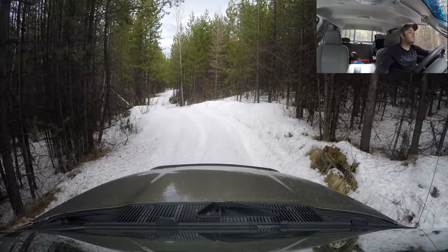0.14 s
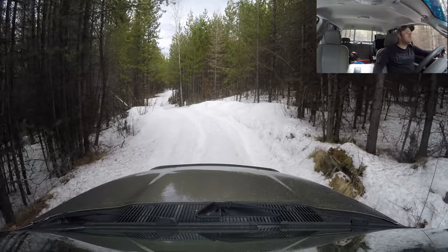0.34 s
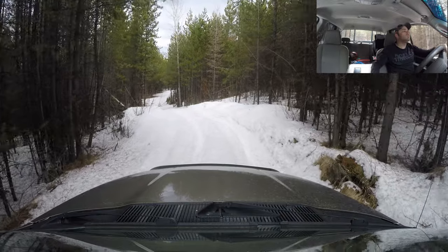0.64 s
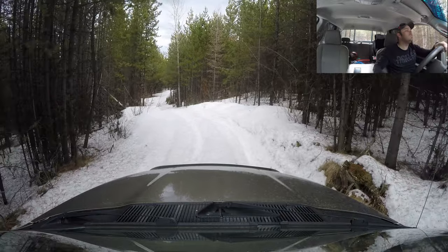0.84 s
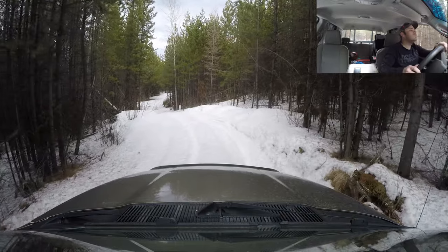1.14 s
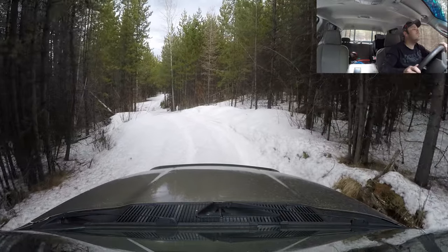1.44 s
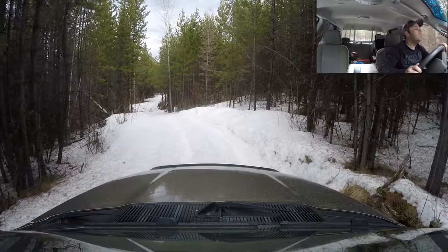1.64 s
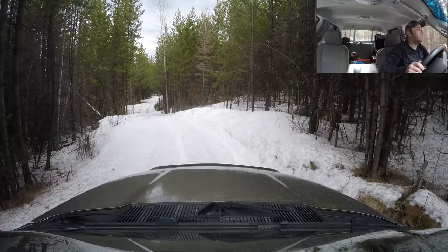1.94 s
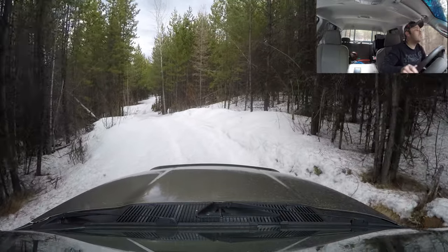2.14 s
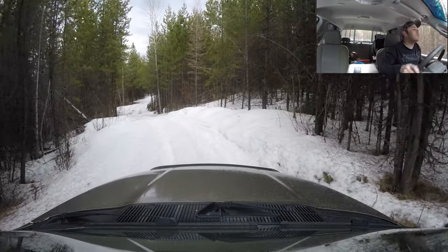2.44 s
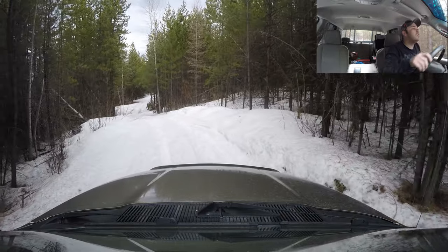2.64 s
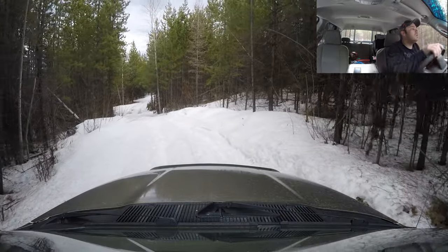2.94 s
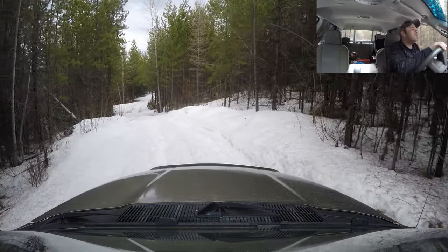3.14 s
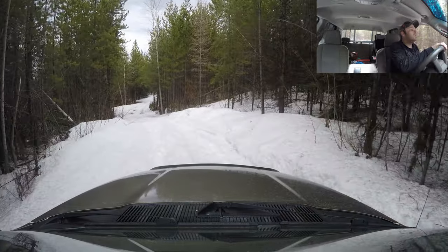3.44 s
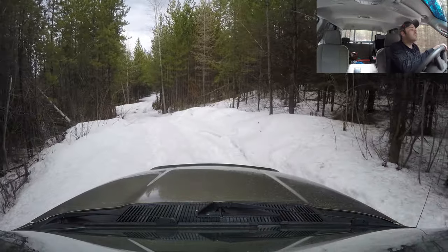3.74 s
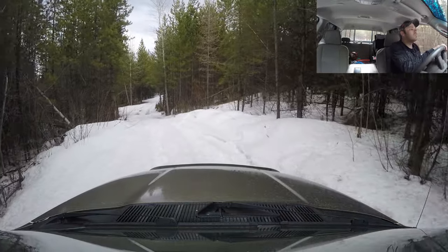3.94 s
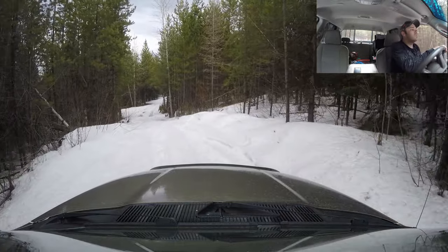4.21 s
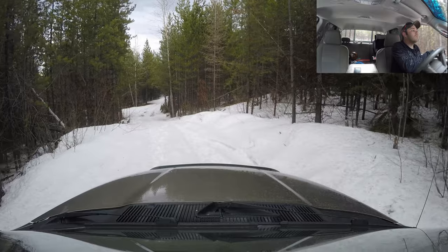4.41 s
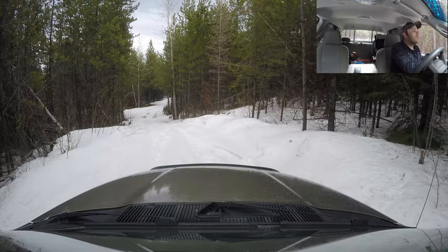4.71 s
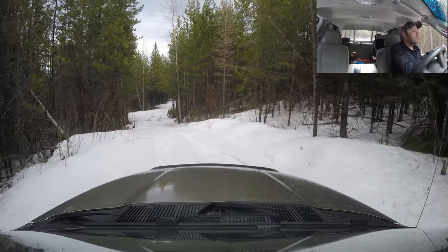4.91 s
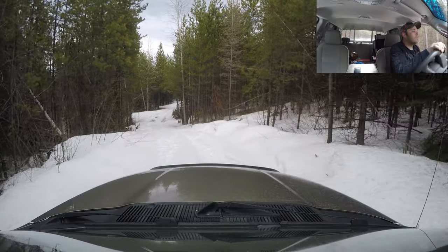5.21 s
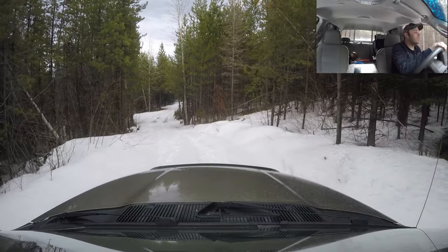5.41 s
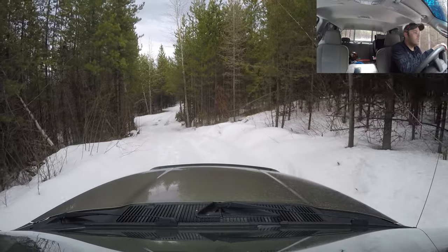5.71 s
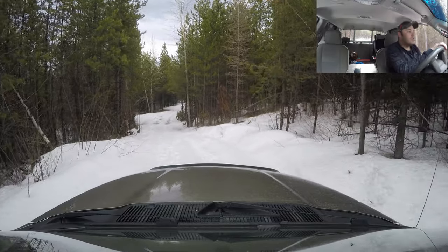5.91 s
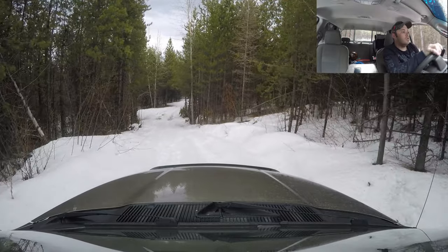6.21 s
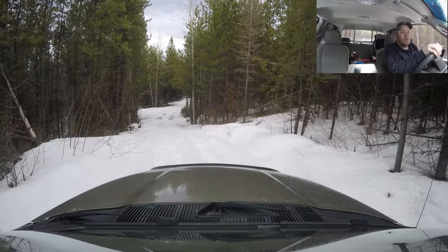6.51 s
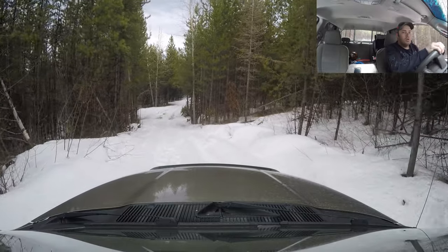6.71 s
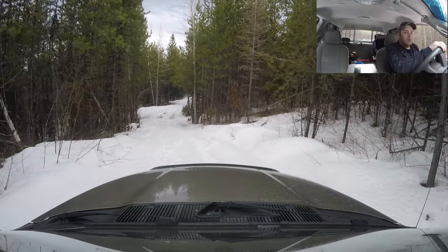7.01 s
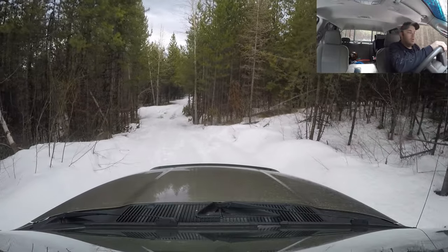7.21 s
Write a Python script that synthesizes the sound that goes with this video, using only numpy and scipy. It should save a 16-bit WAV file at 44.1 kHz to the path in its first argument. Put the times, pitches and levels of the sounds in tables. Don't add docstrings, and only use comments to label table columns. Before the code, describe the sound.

The sound opens abruptly inside a truck cab, with a large engine droning low and slowly sinking in pitch under load. Very deep, irregular heaves and booms from ruts dominate, over muffled tyre roar and soft snow hiss. At 0.3 and 0.65 seconds loose trim knocks, with a short creak, then a dull thud at 0.85 and a door panel buzzing. Around 2.1 to 2.5 a faint crust crunch comes with light ticks and one duller tap. From 3 to 4.8 it rolls steadily, the driveshaft humming slightly higher. Near 5.1 come ticks, a tiny seat squeak and wetter hiss, then soft thuds at 5.35 and 5.7. More knocks and thuds follow between 6.3 and 6.7. An axle hum swells around 6.3 and again near 7.1, engine lugging until the abrupt end at about 7.4.

```python
import sys
import numpy as np
from scipy import signal
from scipy.fft import rfft, irfft
from scipy.io import wavfile
from scipy.ndimage import uniform_filter1d

SR = 44100
rng = np.random.default_rng(int(sys.argv[2]) if len(sys.argv) > 2 else 0)


def voltage_ratio(level):
    return 10 ** (np.asarray(level, float) / 20)


def bounce(signal):
    frames = np.transpose(np.atleast_2d(signal))
    limited = np.clip(frames, -1, 1)
    pcm = np.round(limited * 32767).astype(np.int16)
    wavfile.write(sys.argv[1], SR, pcm)


N = 324576


def evened(x):
    return x / np.sqrt(np.mean(x ** 2) + 1e-20)


def at_samples(s, values):
    return np.interp(np.arange(N) / SR, s, values)


def curves(rows):
    s, *columns = np.transpose(rows)
    return [at_samples(s, c) for c in columns]


def swells(rows, rest_db):
    t = np.arange(0, N / SR + .01, .002)
    rows = np.array(rows)
    half_lengths = (t - rows[:, :1]) / rows[:, 2:3]
    shape_db = rows[:, 1:2] - 14.5 * half_lengths ** 2
    power = voltage_ratio(2 * np.maximum(shape_db, -150))
    db = 10 * np.log10(power.sum(axis=0) + voltage_ratio(2 * rest_db))
    held = uniform_filter1d(rows[shape_db.argmax(axis=0), -1], size=15)
    return [at_samples(t, c) for c in (db, held)]


def spectrum_db(points, hz):
    f, db = np.transpose(points)
    return np.interp(np.log(hz + 1), np.log(f + 1), db)


def coloured(x, db):
    return evened(irfft(rfft(x) * voltage_ratio(db), N))


def near(hz, mode_hz, width_hz):
    return -10 * np.log10(1 + (2 * (hz - mode_hz) / width_hz) ** 2)


def drift(width_hz):
    r = np.exp(-np.pi * width_hz / SR)
    z = rng.standard_normal(N) + 1j * rng.standard_normal(N)
    for _ in range(2):
        z = signal.lfilter([1 - r], [1, -r], z)
    return z / np.sqrt(np.mean(abs(z) ** 2))


def tone(hz, db, rough, width_hz):
    rough = np.clip(rough, 0, 1)
    turn = np.exp(2j * np.pi * (np.cumsum(hz, axis=-1) / SR + rng.random()))
    wobble = np.sqrt(1 - rough) + np.sqrt(rough) * drift(width_hz)
    return np.sqrt(2) * voltage_ratio(db) * (turn * wobble).real


def ring(x, hz, width_hz):
    b, a = signal.iirpeak(min(hz, 15000), max(hz / width_hz, .6) / 0.77, SR)
    return signal.lfilter(b, a, signal.lfilter(b, a, x))


def add(mix, s, sound):
    part = mix[round(s * SR):][:len(sound)]
    part += sound[:len(part)]


# time in seconds, roar in dB.
ROLL = [(0, -44), (.8, -43.5), (1.1, -45.5), (1.9, -47), (2.74, -46.5), (3.27, -45.5), (4.09, -47),
        (4.42, -46), (4.82, -47), (5.19, -48.5), (5.4, -47.5), (6.23, -48.5), (7.36, -49)]
ROLL_MID_DB = -45
# frequency in Hz, level in dB per Hz.
ROAR_SPECTRUM = [(26, -26), (45, -7.5), (64, -9.5), (86, -16.5), (119, -15.5), (173, -12), (242, -19),
                 (317, -28), (366, -25), (472, -31.5), (553, -29), (701, -36), (784, -34.5), (933, -43),
                 (2000, -58.5), (2600, -87.5), (4400, -120)]
HISS_SPECTRUM = [(530, -15), (900, -1.5), (1040, -4), (1120, -8.5), (1690, -9), (1840, -9.5), (2540, -13.5),
                 (11100, -31), (14400, -39), (15500, -51.5)]
CRUNCH_SPECTRUM = [(1500, -12), (4000, 0), (7000, -5), (11000, -7), (15600, -8)]
# frequency in Hz, width in Hz, lift in dB.
CAB_MODES = [(168, 11, 3), (286.4, 29, 4.5), (503, 47, 0.5), (563, 120, -0.5), (752, 28, 1.5),
             (1079, 96, 3), (1300, 87, 4), (1462, 53, 2.5), (700, 72, -3), (2500, 430, 3.5),
             (4500, 1100, 2)]
# middle in seconds, level in dB, half length in seconds.
SLUSH = [
    (.55, -4, 0.45),
    (1.9, -1.5, 0.38),
    (2.74, -4, 0.5),
    (4.42, -9, 0.16),
    (5.19, 0, 0.39),
    (6.6, -0.5, 0.47),
]
# middle in seconds, level in dB, half length in seconds.
CRUST = [
    (2.12, -58.5, 0.14),
    (2.26, -63.5, 0.16),
    (2.39, -61, 0.072),
    (5.15, -73, 0.2),
    (6.13, -67.5, 0.24),
]


def rolling():
    roar_db, = curves(ROLL)
    crust_db, _ = swells(CRUST, rest_db=-70.5)
    slush_db, _ = swells(SLUSH, rest_db=2.0)
    hiss_db = -53.5 + 0.66 * (roar_db - ROLL_MID_DB) + slush_db
    hz = np.fft.rfftfreq(N, 1 / SR)
    modes_db = sum(db / (1 + (2 * (hz - f) / width_hz) ** 2) for f, width_hz, db in CAB_MODES)

    roar = coloured(rng.standard_normal(N), spectrum_db(ROAR_SPECTRUM, hz) + modes_db)
    flicker = voltage_ratio(.9 * drift(90).real)
    hiss = coloured(rng.standard_normal(N) * flicker, spectrum_db(HISS_SPECTRUM, hz) + modes_db)

    breaks = rng.random(N) < 2500 / SR
    grains = voltage_ratio(3.0 * np.minimum(rng.exponential(1, N), 4)) * breaks
    puffs = signal.lfilter([1], [1, -np.exp(-1 / 30)], grains) * rng.standard_normal(N)
    crunch = coloured(puffs, spectrum_db(CRUNCH_SPECTRUM, hz))
    return roar * voltage_ratio(roar_db + 16.5) + hiss * voltage_ratio(hiss_db) + crunch * voltage_ratio(crust_db)


# frequency in Hz, width in Hz, level in dB.
GLASS = [(525, 18, -55), (571, 16, -54), (770, 20, -57), (860, 12, -64), (1040, 16, -65)]
# middle in seconds, level in dB, half length in seconds.
BRACKET = [
    (1.95, -62, .25),
    (3.5, -65, .3),
    (4.3, -66, .3),
    (6.12, -65, .2),
    (6.9, -66, .12),
]


def glass_and_bracket():
    roar_db, = curves(ROLL)
    still = np.ones(N)
    out = tone(1420 * still, swells(BRACKET, rest_db=-73)[0], rough=0.98, width_hz=11)
    for hz, width_hz, db in GLASS:
        out += tone(hz * still, db + roar_db - ROLL_MID_DB, rough=0.96, width_hz=width_hz)
    return out


# start in seconds, peak in dB, ring in Hz, width in Hz.
TICKS = [(0.049, -46, 2280, 1200), (0.58, -54, 9700, 5000), (0.99, -46, 3000, 1215),
         (1.893, -49, 7005, 3990), (1.982, -48, 4000, 3990), (2.117, -55, 7740, 1498),
         (2.22, -52, 6400, 2010), (2.376, -49, 7000, 9000), (2.414, -47, 3800, 2500),
         (2.457, -39, 624, 398), (2.552, -43, 4130, 2200), (2.574, -47, 4500, 3000),
         (2.892, -52, 7420, 9010), (3.81, -46, 1302, 300), (4.02, -57, 11600, 4000),
         (4.42, -51, 6030, 2005), (4.457, -49, 5503, 1210), (5.11, -46, 5030, 2500),
         (5.109, -43, 2280, 1508), (5.141, -50, 6013, 7000), (5.18, -49.5, 4500, 4000),
         (5.18, -47, 2053, 500), (5.277, -47, 2500, 700), (5.283, -54, 3130, 1200),
         (5.665, -48, 2770, 1500), (5.942, -54, 5400, 1497), (6.09, -44, 5340, 1000), (6.1, -52, 5200, 700),
         (6.128, -50, 4200, 900), (6.129, -45, 2330, 901), (6.155, -51, 5110, 1500),
         (6.346, -46, 2406, 1200), (6.359, -44, 2870, 1300), (6.589, -42.5, 5490, 5000),
         (6.596, -42.5, 3850, 2500), (6.628, -55, 4010, 1198), (7.357, -47, 6070, 2500),
         (.699, -52, 6000, 900), (1.523, -56, 6000, 4000), (1.61, -51, 4000, 3000),
         (1.942, -56.5, 8000, 2500), (6.068, -55, 4500, 900), (6.311, -53, 4500, 900),
         (7.251, -53, 5800, 2000), (7.266, -57, 12000, 4000), (7.317, -52, 7970, 5000)]
KNOCKS = [(.297, -44.5, 4300, 1100), (.296, -40, 1600, 600), (.299, -48, 3300, 900),
          (.309, -50, 5000, 1200), (.63, -52, 8425, 1200), (.63, -43, 2800, 1200), (.646, -38, 4450, 800),
          (.647, -32, 1400, 500), (.649, -29, 450, 600), (.647, -44, 2800, 1600), (.66, -45, 2300, 2000),
          (.664, -55, 6000, 700), (.665, -37, 900, 1500), (.69, -46, 2000, 1500), (6.33, -45, 2300, 900),
          (6.33, -43, 3100, 1300), (6.363, -44, 1800, 2000), (6.3655, -31, 520, 250),
          (6.447, -55, 6500, 4000), (6.445, -50, 3900, 1000)]
THUDS = [
    (.85, -26, 190, 90),
    (5.35, -24, 190.6, 121.7),
    (5.7, -23.5, 170, 159.6),
    (5.76, -31, 198, 120),
    (6.45, -30, 181.1, 100),
    (6.721, -26.5, 110.8, 100),
]


def knocking():
    out = np.zeros(N)
    t = np.arange(2000) / SR
    fade = signal.windows.tukey(4000, .3)[2000:]
    for rows, t60_s in ((TICKS, .03), (KNOCKS, .055), (THUDS, .22)):
        for s, db, hz, width_hz in rows:
            puff = rng.standard_normal(2000) * voltage_ratio(-60 * t / t60_s)
            blow = ring(puff, hz, width_hz)
            add(out, s, voltage_ratio(db) * fade * blow / abs(blow).max())
    return out


# start in seconds, length in seconds, level in dB, two rings in Hz.
CREAKS = [
    (0.643, 0.017, -41, 1341, 4500),
    (0.644, 0.036, -51, 1720, 3000),
    (0.804, 0.067, -54, 1370, 1690),
    (1.28, .025, -55, 1660, 2600),
    (5.091, 0.13, -60, 2206, 2597),
    (5.254, 0.1, -63, 2233, 2586),
    (6.339, 0.028, -53, 1300, 2228),
]
# time in seconds, pitch in Hz, level in dB.
SQUEAK = [
    (5.02, 2920, -110),
    (5.04, 2920, -75),
    (5.07, 2840, -65),
    (5.11, 2900, -61),
    (5.13, 3020, -59),
    (5.17, 3010, -61),
    (5.2, 3030, -76),
    (5.22, 3030, -110),
]


def creaking():
    squeak_hz, squeak_db = curves(SQUEAK)
    out = tone(squeak_hz, squeak_db, rough=.75, width_hz=110)
    t = np.arange(9000) / SR
    for s, length_s, db, hz, other_hz in CREAKS:
        slips = rng.standard_normal(9000)
        envelope = np.interp(t, [0, .003, length_s, length_s + 0.0055], [0.053, 0.83, 0.57, 0.031])
        slips = slips * abs(slips) * envelope
        creak = ring(slips, hz, 350) + voltage_ratio(-12.5) * ring(slips, other_hz, 460)
        add(out, s, voltage_ratio(db) * evened(creak) * np.sqrt(length_s * SR / 9000))
    return out


# middle in
# seconds, level in dB, half length in seconds, frequency in Hz.
HEAVE = [(0.035, -18.5, 0.048, 18), (0.261, -18, 0.37, 21), (0.567, -12.5, 0.14, 19.4),
         (0.792, -9, 0.098, 19), (0.984, -19, 0.11, 21.3), (1.224, -12.5, 0.25, 20.4),
         (1.568, -11.5, 0.087, 20.3), (1.807, -13, 0.22, 19), (2.162, -11.5, 0.076, 21.8),
         (2.296, -20.5, 0.052, 21), (2.417, -19, 0.1, 17.3), (2.655, -10.5, 0.13, 20.2),
         (3.036, -13, 0.16, 20.8), (3.665, -12, 0.39, 19.3), (4.051, -21, 0.092, 22.9),
         (4.345, -15, 0.16, 21.4), (4.587, -18, 0.064, 19.5), (4.704, -19, 0.051, 22.24),
         (4.842, -17, 0.099, 20.3), (5.068, -15, 0.15, 19.4), (5.29, -19.5, 0.149, 18.7),
         (5.77, -14, 0.1, 20.6), (6.131, -15, 0.25, 19.7), (6.454, -12.5, 0.26, 20.4),
         (6.864, -12.5, 0.12, 20.7), (7.174, -11, 0.18, 20.1)]
BOOM = [(0.135, -15.5, 0.15, 41.57), (0.562, -18.5, 0.12, 42.24), (0.728, -8, 0.12, 39.9),
        (0.95, -13, 0.057, 41.8), (1.116, -16.5, 0.092, 39), (1.224, -16.5, 0.042, 41.62),
        (1.373, -18, 0.09, 40), (1.586, -14.5, 0.11, 40.92), (2.105, -19.5, 0.12, 42.76),
        (2.598, -19, 0.16, 44.18), (2.983, -19, 0.13, 41.2), (3.211, -12.5, 0.11, 40.15),
        (3.378, -14.5, 0.073, 38.94), (3.52, -17.5, 0.18, 42.84), (3.876, -15, 0.058, 44.3),
        (3.994, -13.5, 0.051, 40.7), (4.091, -11.5, 0.048, 40.87), (4.505, -19, 0.14, 40.63),
        (4.799, -16.5, 0.17, 43.7), (4.997, -9, 0.12, 40.53), (5.202, -17.5, 0.041, 42.22),
        (5.34, -15, 0.14, 42.25), (5.574, -12.5, 0.29, 40.01), (5.852, -10, 0.056, 41.48),
        (6.024, -20, 0.077, 42.7), (6.309, -13, 0.087, 42.2), (6.546, -14.5, 0.26, 40.3),
        (6.761, -13.5, 0.039, 42.87), (6.917, -14, 0.17, 39.4), (7.222, -17.5, 0.087, 40.04),
        (0.34, -19.5, 0.027, 40.4),
    (0.416, -19, 0.031, 40.25),
    (1.774, -20, 0.1, 40.4),
    (1.937, -19, 0.062, 41.3),
    (2.232, -20, 0.043, 41.34),
    (2.347, -22.5, 0.058, 42.74),
    (2.434, -22.5, 0.046, 42.7),
    (2.829, -22, 0.083, 41.02),
    (4.276, -28.5, 0.11, 40.9),
    (6.185, -23.5, 0.096, 39.6),
]
SWAY = [
    (.35, -27.5, 0.29, 50.77),
    (1.0, -25.5, 0.1483, 51.77),
    (2.15, -21.5, .15, 47.82),
    (2.65, -23, 0.19, 45.76),
    (3.6, -21, .2, 47),
    (4.1, -23, .25, 46.63),
    (4.75, -26.5, .12, 45.82),
    (5.3, -26, 0.17, 48.86),
    (6.3, -25.5, 0.11, 50.07),
    (6.75, -23, 0.21, 49.24),
]
DRONE = [
    (.3, -29, .3, 167.3),
    (.75, -29.5, 0.118, 165),
    (5.4, -37, .2, 177.9),
    (5.75, -35.5, 0.16, 171.9),
    (6.45, -33.5, 0.091, 171.6),
    (6.62, -31, 0.076, 168.4),
    (7.0, -41, 0.24, 162.8),
]


def body():
    heave_db, heave_hz = swells(HEAVE, rest_db=-24.5)
    boom_db, boom_hz = swells(BOOM, rest_db=-35)
    sway_db, sway_hz = swells(SWAY, rest_db=-37.5)
    drone_db, drone_hz = swells(DRONE, rest_db=-41.5)
    out = tone(heave_hz, heave_db, rough=.1, width_hz=26)
    out += tone(boom_hz, boom_db, rough=.1, width_hz=26)
    out += tone(sway_hz, sway_db, rough=.15, width_hz=8)
    return out + tone(drone_hz, drone_db, rough=.2, width_hz=15)


# time in seconds, turns per second.
SHAFT = [(0, 24.6), (.5, 24.6), (.76, 23), (1.05, 24.44), (1.3, 23.35), (1.65, 25.3), (1.78, 27),
         (2.1, 27.1), (2.6, 28.5), (2.72, 29.2), (2.95, 31.2), (3.2, 31.7), (4, 32.1), (4.5, 31.4),
         (4.87, 29.4), (5.1, 28.15), (5.35, 27.4), (5.66, 26.85), (6.1, 24.75), (6.85, 25.4), (7.36, 23.99)]


def shaft_speed():
    return curves(SHAFT)[0]


# middle in seconds, level in dB, half length in seconds.
PANEL = [(.43, -51, 0.36), (.91, -31.5, 0.17), (1.85, -39, 0.3), (2.22, -35.5, 0.18), (2.58, -35, 0.43),
         (3.3, -37, 0.39), (3.9, -40, 0.55), (4.6, -39, 0.61), (5.25, -39.5, 0.39), (5.7, -35, 0.29),
         (6.4, -41, 0.99), (7.2, -62, 0.59)]
# beats per shaft turn, level in dB.
LUG_ROWS = [(11.4, -9), (11.9, -8), (12.35, -3), (12.66, -7), (13.03, 2), (13.4, -8)]


def door_panel():
    panel_hz, lug_db = 360.9, -42.5
    panel_db, _ = swells(PANEL, rest_db=-44)
    beats, rows_db = np.transpose(LUG_ROWS)[:, :, None]
    lugs_hz = beats * shaft_speed()
    shaken_db = 0.58 * (panel_db - lug_db)
    lugs_db = lug_db + rows_db + shaken_db + 2 * near(lugs_hz, panel_hz + 5, width_hz=43.7)
    lugs = tone(lugs_hz, lugs_db, rough=.12, width_hz=9).sum(axis=0)
    return lugs + tone(panel_hz * np.ones(N), panel_db - 5.5, rough=0.98, width_hz=45.9)


# time in seconds, dB on orders 3 and 4.
TORQUE = [(0, -9), (.8, -5), (1.3, 1.5), (2.5, 1.5), (3.2, 3), (4, -3), (4.6, 1.5), (5.2, 1), (5.8, 0),
          (6.3, -3), (7.36, -4)]
# order, level in dB.
SHAFT_FAINT = [(9, -48.5)]
# middle in seconds, level in dB, half length in seconds.
WHINE = [(.8, -62, 0.28), (1.84, -55.5, 0.13), (2.05, -63, 0.29), (3.5, -74, 0.4), (4.91, -56, .08),
         (5.0, -59, .08), (5.11, -55.5, .1), (5.25, -54.5, .11), (5.74, -53.5, .12), (5.97, -59, .24),
         (7.03, -60, 0.19), (7.3, -57.5, 0.23)]
# time in seconds, pitch in Hz, level in dB.
HUM = [
    (5.8, 517, -59),
    (6.001, 509, -50.5),
    (6.35, 508, -47.5),
    (6.55, 506, -51),
    (6.95, 504.7, -66),
    (7.128, 497.5, -44),
    (7.3, 500, -69),
]


def driveline():
    speed = shaft_speed()
    torque_db, = curves(TORQUE)
    third_db = -27 - 3 * np.maximum(79 - 3 * speed, 0)
    orders = []
    for k, db in ((3, third_db), (4, -31.5)):
        floor_db = np.maximum(near(k * speed, 97.6, width_hz=6.6), -10.5)
        orders.append((k, db + torque_db + floor_db))
    orders += [(k, db + near(k * speed, 280, width_hz=20)) for k, db in SHAFT_FAINT]
    out = sum(tone(k * speed, db, rough=0.031, width_hz=8.1) for k, db in orders)

    meshes_per_turn = 53.6
    out += tone(meshes_per_turn * speed, swells(WHINE, rest_db=-72)[0], rough=.12, width_hz=40)
    hum_in = at_samples([HUM[0][0] - .05, HUM[0][0]], [0, 1])
    return out + hum_in * tone(*curves(HUM), rough=0.31, width_hz=6.0)


# time in seconds, turns per second.
CRANK = [(0, 26.4), (.6, 26.3), (.85, 25.6), (1.05, 25.2), (1.2, 24.4), (1.5, 24), (3.3, 24.05),
         (3.8, 23.8), (4.3, 23.66), (5, 23.25), (5.8, 22.56), (6.8, 21.7), (7.36, 21.4)]
# order, level in dB.
CRANK_FAINT = [(2, -33), (5, -45), (6, -49)]
# time in seconds, dB on order 7.
LOAD = [(0, -5), (.35, 4.5), (.75, 7), (1.05, 1.5), (1.35, 2), (1.45, -1.5), (1.8, 3), (1.95, -4),
        (2.2, 2.5), (2.7, -1.5), (3.1, -0.5), (3.45, 1), (3.8, 0.5), (4.4, -0.5), (4.68, -4), (4.82, 3),
        (5.0, -3.5), (5.95, -0.5), (6.25, 4), (7.36, -1.5)]
# middle in seconds, level in dB, half length in
# seconds.
PULL = [
    (.45, -35, 0.33),
    (1.2, -31, 0.19),
    (2.2, -35, .5),
    (5.0, -37, 0.29),
]
LABOUR = [
    (.17, -30.5, 0.51),
    (5.8, -53, 0.4),
]
EIGHTH_SWELLS = [
    (.55, -33.5, .75),
    (6.85, -33.5, 0.12),
    (7.23, -28.5, .16),
]


def engine():
    speed, = curves(CRANK)
    load_db, = curves(LOAD)
    third_db, _ = swells(PULL, rest_db=-35.5)
    fourth_db, _ = swells(LABOUR, rest_db=-48.5)
    seventh_db = -24 + load_db + near(7 * speed, 168.1, width_hz=5.67)
    eighth_db = np.maximum(-41, swells(EIGHTH_SWELLS, rest_db=-55)[0])
    orders = [(3, third_db), (4, fourth_db), (7, seventh_db), (8, eighth_db)] + CRANK_FAINT
    return sum(tone(k * speed, db, rough=.04, width_hz=9) for k, db in orders)


def scene():
    cab = rolling() + glass_and_bracket() + knocking() + creaking()
    cab += body() + door_panel() + driveline() + engine()
    opening = at_samples([0, .004], [.2, 1])
    return (cab * opening)[None]


def patchy_treble(x):
    hz, t, z = signal.stft(x, SR, nperseg=1024)
    luck = evened(uniform_filter1d(rng.standard_normal(z.shape), size=12, axis=0))
    luck = luck + 1.2 * rng.standard_normal(len(t))
    need = np.interp(hz, [11500, 12500, 15130, 15180], [-9, -2.6, -.8, 2.6])
    gain = np.where(luck > need[:, None], 1, voltage_ratio(-25))
    return signal.istft(z * gain, SR, nperseg=1024)[1][:N]


def band_limit(x):
    return signal.sosfilt(signal.butter(12, 15630, fs=SR, output="sos"), x)


def record(dry):
    x = signal.sosfilt(signal.butter(2, 11, "high", fs=SR, output="sos"), dry[0])
    x = x * np.interp(np.arange(N), [N - .006 * SR, N - 1], [1, 0])
    x = patchy_treble(1.08 * np.tanh(x / 1.05))
    return band_limit(x[None])


dry = scene()
out = record(dry)
bounce(out)
```